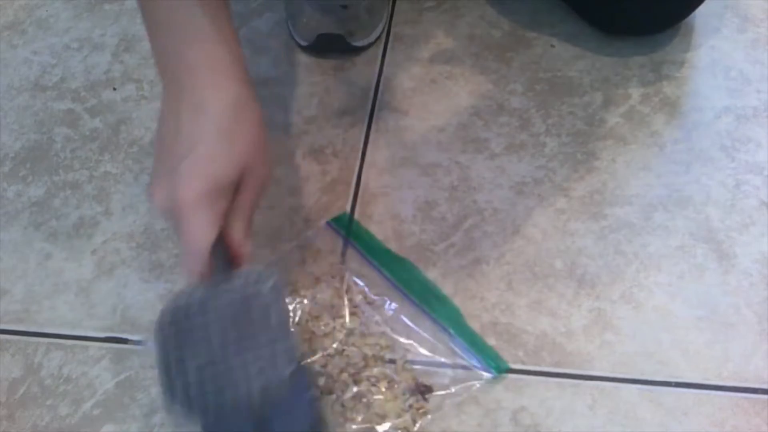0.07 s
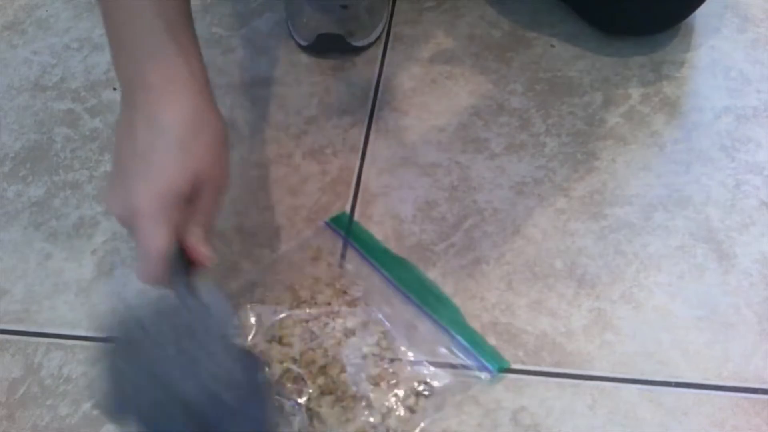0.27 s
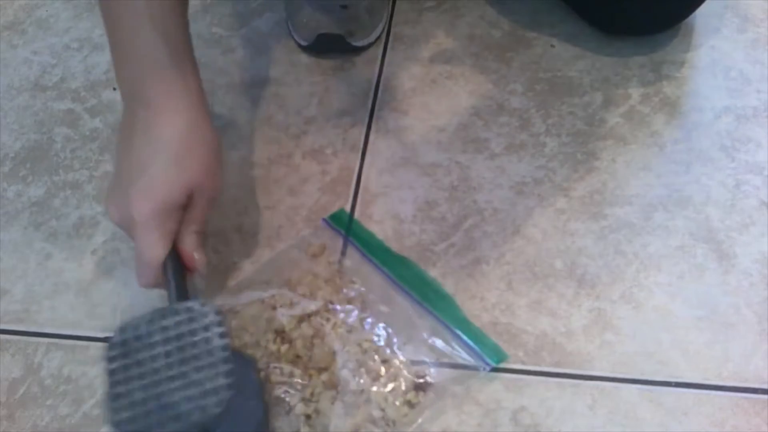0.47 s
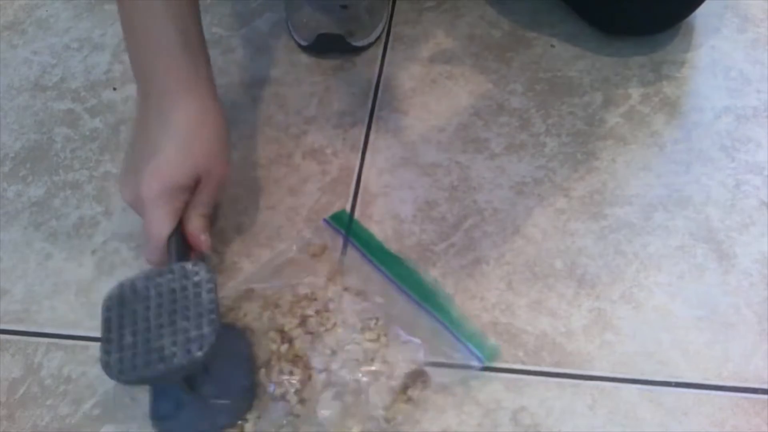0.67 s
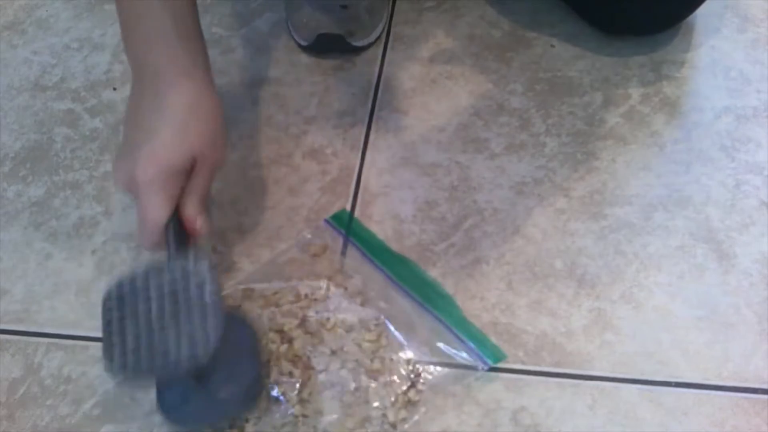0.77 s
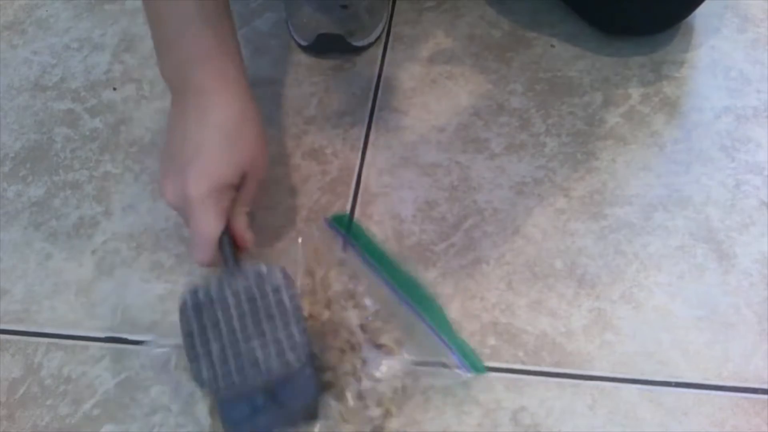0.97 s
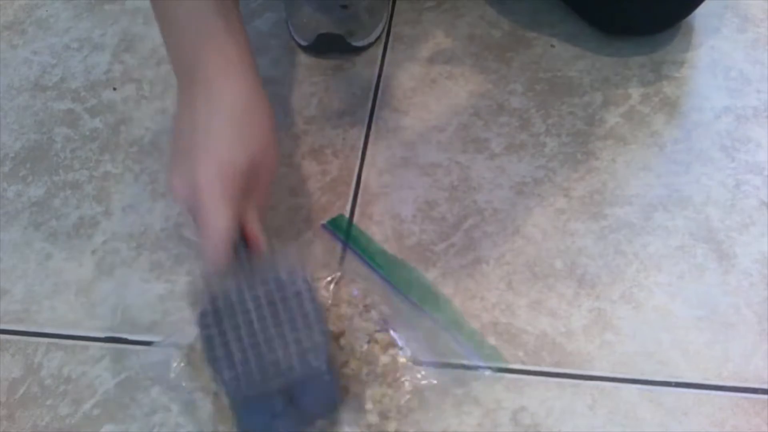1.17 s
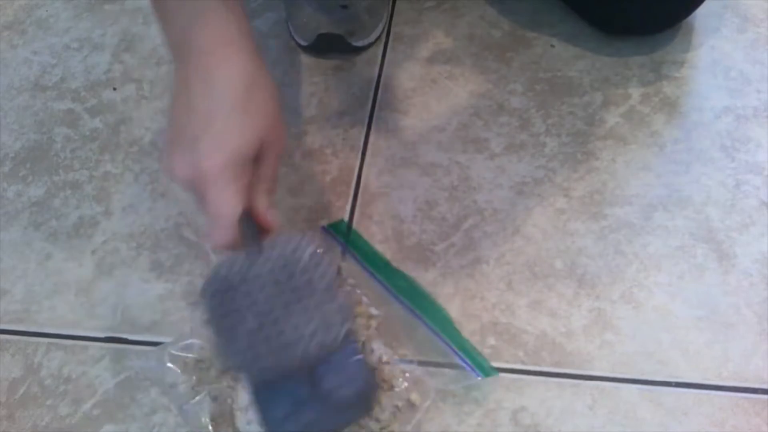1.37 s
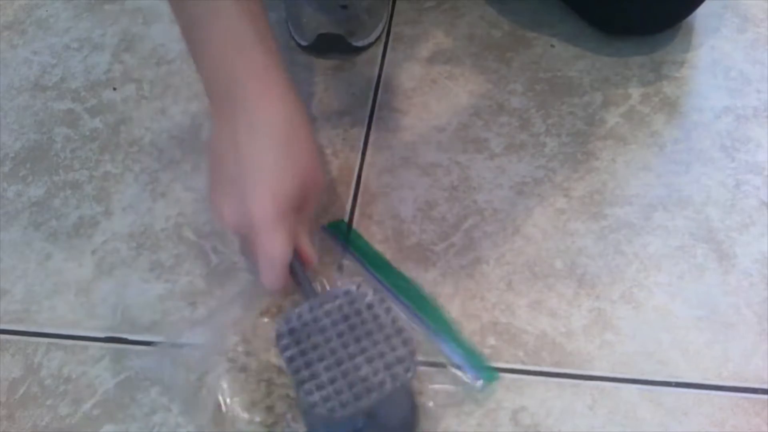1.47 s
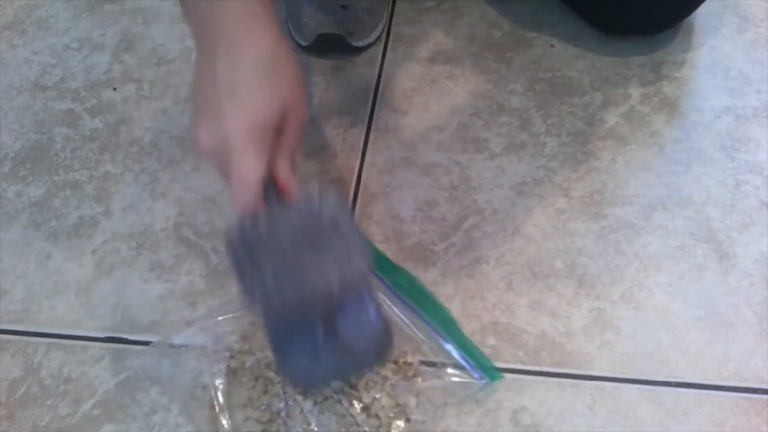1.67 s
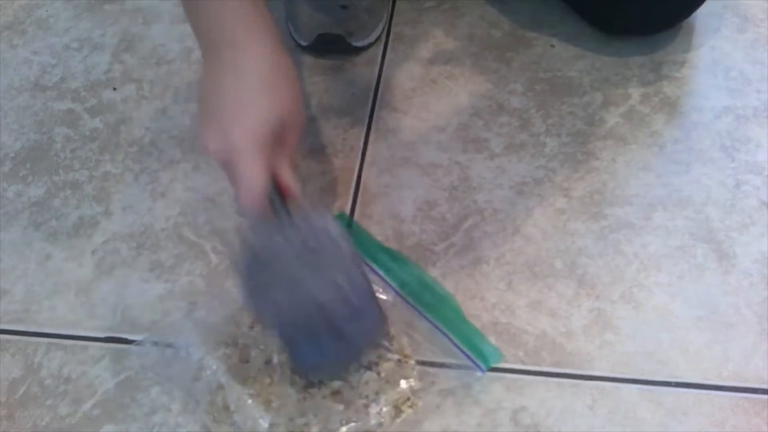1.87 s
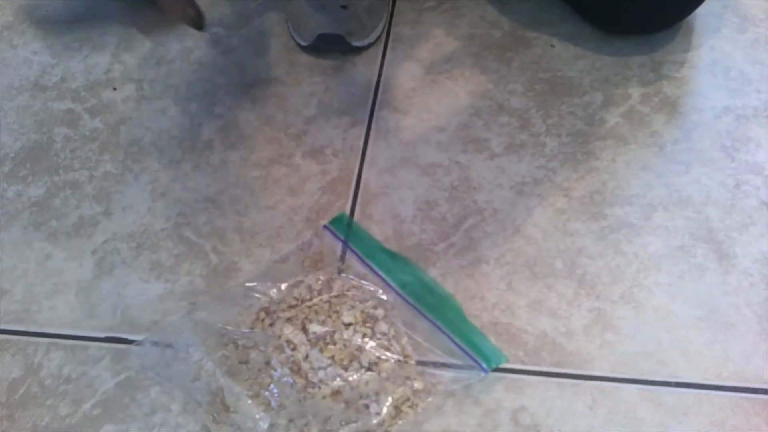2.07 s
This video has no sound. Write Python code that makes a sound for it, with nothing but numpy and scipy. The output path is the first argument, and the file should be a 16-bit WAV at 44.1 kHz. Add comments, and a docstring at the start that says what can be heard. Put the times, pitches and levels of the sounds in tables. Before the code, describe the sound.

A metal meat mallet pounds walnuts in a plastic bag on a hard tile floor

```python
"""First the last ringing and rustling of a blow just landed, then seven more blows about 0.3 s apart:
a metal meat mallet pounds walnuts in a plastic bag on a tiled kitchen floor, heard from close above.
Random clicks make the crunching nuts and rustling bag; damped sines make the thud, crack, tile and mallet.
Dying noise makes the room's answer, steady noise the room tone; the loudest landings overload the recorder."""
import sys
import numpy as np
from scipy import signal
from scipy.fft import rfft, irfft, next_fast_len
from scipy.io import wavfile

SR = 44100
rng = np.random.default_rng(int(sys.argv[2]) if len(sys.argv) > 2 else 0)


def digitize_waveform(pressure):
    """Quantize a signal to 16-bit integers and store it at the path in sys.argv[1].

    Rows of a 2-D input are taken as channels; values are limited to [-1, 1].
    """
    field = np.atleast_2d(pressure).T
    bounded = np.clip(field, -1, 1)
    quanta = np.round(bounded * 32767).astype(np.int16)
    wavfile.write(sys.argv[1], SR, quanta)


def how_loud(loudness_db):
    """Turn decibels into a plain amplitude multiplier (0 dB gives 1, 20 dB gives 10)."""
    steps = np.asarray(loudness_db, float) / 20
    return 10 ** steps


N = 93492

# steady room tone, its balance from low to high: pitch_hz, level_db
ROOM_TONE = [(15, -51), (25, -22), (175, 3.5), (786, -3), (1010, -10.5), (3120, -20), (4410, -29.5),
             (7040, -27.5), (9000, -11.5), (11700, -41), (19800, -120)]
# how the kitchen's echoes die at each pitch: pitch_hz, t60_s (time to fall by 60 dB), level_db
KITCHEN_ECHO = [(80, 0.1, -54.5), (195, 0.42, -10.5), (560, 0.42, -7.5), (1488, 0.48, -8),
                (3240, 0.24, -12.5), (6500, 0.22, -13)]
# tone of the rustling bag film: pitch_hz, level_db
FILM_TONE = [(300, -11), (1000, -11), (2200, -8), (3200, -12), (4600, -28), (7000, -23), (9000, -25.5)]
# short rustles as the film shifts: middle_s, level_db
FILM_SHIFTS = [(0.071, -47.5), (.317, -46), (0.371, -72.5), (.84, -55), (1.121, -42.5), (1.341, -62),
               (1.385, -75), (1.748, -60.5), (1.925, -54)]
# notes of the mallet head: pitch_hz, level_db, t60_s
# its lowest note, a beating pair, starts loud while the tile damps it, then rings on
HEAD_NOTES = [(2008, -23, .44), (2018, -28, .4), (2008, -2, .032), (2245, -24, .17), (2546, -22, .14),
              (2724, -26, .2), (2950, -25, .14), (3240, -24, .12), (3348, -23, .15), (3480, -25, .12),
              (6557, -36, .28)]
# bare metal meets tile: start_s, level_db
METAL_HITS = [(.4712, 0), (1.011, -26), (1.841, -28)]
# tone of cracking shells and kernels: pitch_hz, level_db
NUT_TONE = [(150, -60), (400, -7), (900, -4), (1900, 0), (3000, -5), (4500, -18.5), (7000, -17), (9000, -2)]
# blows, the first lands before the start: landing_s, crush_length_s, crunch_db, bag_settling_db, tile_ring_db
MALLET_BLOWS = [(-.09, 0.016, -41, -34, -16), (0.196, 0.024, -14.5, -41.5, -17),
                (0.4703, 0.0132, -7.5, -30.5, -15.5), (0.74, 0.016, -13.5, -42, -13.5),
                (1.011, 0.012, -6.5, -39, -5.5), (1.266, 0.013, -9.5, -38, 1.5),
                (1.5561, 0.022, -11, -38.5, -9.5), (1.844, 0.017, -6, -32.5, -20)]
# the landing on the tile, one per blow: start_s, push_db, push_pitch_hz, crack_db, crack_pitch_hz
TILE_LANDINGS = [(-.09, -3.5, 430, 1.5, 1720), (0.196, -34, 330, -13.5, 1800),
                 (0.4713, -6, 950, -15.5, 1416), (0.739, -14, 322, -17.5, 1520),
                 (1.0108, -3, 457, -3, 1846), (1.265, 7.5, 560, -4.5, 1620),
                 (1.5542, -4.5, 950, -1.5, 2320), (1.8414, 6, 513, 0.5, 1540)]
# notes of the floor tile: pitch_hz, level_db, t60_s
TILE_NOTES = [(133.7, -6.5, 0.24), (183.7, -25, 0.023), (237.5, -5.5, 0.15), (321, -5.5, 0.035),
              (385.5, 1, 0.053), (518, -19.5, .07), (580, -11, 0.24), (628, -13, 0.29), (770, 2.5, 0.04)]

LEAD = SR // 4   # samples made ahead of the start
M = N + LEAD   # samples made in all
T = (np.arange(M) - LEAD) / SR   # seconds from the start
AIR_DB = -51
FIRST_ECHO_S = .004
HEAD_ROOM_DB = -2.5   # how much of the ringing head reaches the room
RUSTLES_PER_S, SETTLE_T60_S, SHIFT_S = 2300, 0.49, 0.0035
# the crunch swells until landing, then dies
CRACKS_PER_S, CRUSH_RISE_DB, CRUSH_FALL_S = 6200, 23.5, 0.0025
CRUMBLE_DB, CRUMBLE_S = -16, 0.016   # broken pieces keep crumbling under the head
PUSH_T60_CYCLES = 4.9
CRACK_T60_S, CRACK_LEAD = .0045, 26   # the crack comes this many samples before the push
TILE_SPREAD_DB = 1.5   # each blow excites the tile's notes a little differently
# shards jump after a landing, louder when its push is louder
RUBBLE_DB, RUBBLE_S, RUBBLE_PER_S, RUBBLE_T60_S = -26.5, 0.036, 1500, 0.0033
RADIATES_HZ = 129.6   # deeper notes are hardly given off
MIC_LOW_HZ, MIC_STOP_HZ = 40, 8306 * 1.1   # at the upper one the sound is already 60 dB down
OVERLOAD, KNEE = .71, 10.0   # peak limit, and how sharply it sets in


def rms_one(x):
    """Scales to an average strength (rms) of 1."""
    return x / np.sqrt(np.mean(x ** 2) + 1e-20)


def at_hz(points, hz, column=1):
    """Reads a table between its rows, on a log-frequency axis."""
    p = np.array(points)
    return np.interp(np.log(np.maximum(hz, 1)), np.log(p[:, 0]), p[:, column])


def colour(x, spectrum):
    """Gives the sound a spectrum with a filter that never acts early (minimum phase)."""
    size = next_fast_len(M + 4096)
    hz = np.arange(size // 2 + 1) * SR / size
    cepstrum = irfft(np.log(how_loud(at_hz(spectrum, hz))), size)
    # folding the second half onto the first makes the filter causal
    cepstrum[1:size // 2] *= 2
    cepstrum[size // 2 + 1:] = 0
    return irfft(rfft(x, size) * np.exp(rfft(cepstrum)), size)[:M]


def clicks(s, db):
    """A train of single-sample clicks."""
    out = np.full(M, 1e-18)
    out[LEAD + (np.asarray(s) * SR).astype(int)] = how_loud(db)
    return out


def ring(x, hz, t60):
    """A resonance: a unit click sets a dying sine of starting height 1 ringing."""
    r = how_loud(-60 / (t60 * SR))
    w = 2 * np.pi * hz / SR
    return signal.lfilter([0, np.sin(w)], [1, -2 * r * np.cos(w), r * r], x)


def grains(per_s, size_db, spectrum):
    """Random clicks of uneven size, coloured, at rms 1."""
    sizes = how_loud(size_db * np.minimum(rng.exponential(1, M), 4)) * rng.choice([-1, 1], M)
    happens = rng.random(M) < per_s / SR
    return rms_one(colour(sizes * happens, spectrum))


def room_tone():
    """The quiet kitchen: steady coloured noise."""
    return how_loud(AIR_DB) * rms_one(colour(rng.standard_normal(M), ROOM_TONE))


def kitchen(x):
    """The room answers with many echoes: noise that dies at its own speed in each band."""
    t = np.arange(SR // 2) / SR
    edges = 60 * 2 ** np.arange(0, 7.6, .5)   # half-octave bands, in Hz
    white = rng.standard_normal((2, len(t)))   # neighbouring bands take turns
    tail = 0
    for k, (low, high) in enumerate(zip(edges, edges[1:])):
        hz = np.sqrt(low * high)
        t60 = at_hz(KITCHEN_ECHO, hz)
        band_filter = signal.butter(2, [low, high], "band", fs=SR, output="sos")
        band = signal.sosfilt(band_filter, white[k % 2])
        fading = how_loud(at_hz(KITCHEN_ECHO, hz, column=2) - 60 * t / t60)
        even_out = np.sqrt(2 * np.log(1000) / (t60 * SR))   # long tails get no extra energy
        tail = tail + band * fading * even_out
    return signal.fftconvolve(x, tail * np.clip(t / FIRST_ECHO_S - 1, 0, 1))[:M]


def bag():
    """Film and crumbs rustle on after each blow, and shift a few times later."""
    shape = 0
    for s, _, _, db, _ in MALLET_BLOWS:
        shape = shape + how_loud(db - 60 * np.maximum(T - s, 0) / SETTLE_T60_S) * (T > s)
    for s, db in FILM_SHIFTS:
        shape = shape + how_loud(db) * np.exp(-.5 * ((T - s) / SHIFT_S) ** 2)
    return shape * grains(RUSTLES_PER_S, size_db=4.0, spectrum=FILM_TONE)


def head():
    """Where bare metal meets tile, the mallet head rings at its own notes."""
    hits = clicks(*np.transpose(METAL_HITS))
    return sum(ring(hits * how_loud(db), hz, t60) for hz, db, t60 in HEAD_NOTES)


def nuts():
    """Shells and kernels crackle louder as the head presses down, then die away once it lands."""
    shape = 0
    for s, length, db, _, _ in MALLET_BLOWS:
        swell = how_loud(CRUSH_RISE_DB * np.clip((T - s) / length, -1, 0))
        fade_in = np.clip((T - s + length) / 0.0044, 0, 1)
        after = np.maximum(T - s, 0)
        fall = np.exp(-after / CRUSH_FALL_S) + how_loud(CRUMBLE_DB) * np.exp(-after / CRUMBLE_S)
        shape = shape + how_loud(db) * swell * fade_in * fall
    return shape * grains(CRACKS_PER_S, size_db=2.0, spectrum=NUT_TONE)


def landing():
    """A damped low push that also rings the tile, a short crack, and jumping shards."""
    out = np.zeros(M)
    spread = rng.normal(0, TILE_SPREAD_DB, (len(MALLET_BLOWS), len(TILE_NOTES)))
    for (s, push_db, push_hz, crack_db, crack_hz), blow, odd_db in zip(TILE_LANDINGS, MALLET_BLOWS, spread):
        at = LEAD + int(s * SR)
        span = slice(at - 100, at + SR // 2)
        hit = clicks([s], [0])[span]
        push = ring(hit, push_hz, PUSH_T60_CYCLES / push_hz)
        drive = push * push_hz / SR   # what the push gives to the tile
        tile = sum(ring(drive, hz, t60) * how_loud(db + odd) for (hz, db, t60), odd in zip(TILE_NOTES, odd_db))
        crack = ring(np.roll(hit, -CRACK_LEAD), crack_hz, CRACK_T60_S)
        jumps = rng.standard_normal(len(hit)) * (rng.random(len(hit)) < RUBBLE_PER_S / SR)
        dying = signal.lfilter([1], [1, -np.exp(-1 / (RUBBLE_S * SR))], hit)
        rubble = rms_one(ring(jumps, crack_hz, RUBBLE_T60_S)) * dying
        out[span] += how_loud(push_db) * (push + how_loud(RUBBLE_DB) * rubble)
        out[span] += how_loud(blow[4]) * tile + how_loud(crack_db) * crack
    return signal.sosfilt(signal.butter(5, RADIATES_HZ, "high", fs=SR, output="sos"), out)


def scene():
    """Blows, their room, and the room tone."""
    near = nuts() + bag() + landing()
    metal = head()
    echoes = kitchen(near + how_loud(HEAD_ROOM_DB) * metal)
    return (near + metal + echoes + room_tone())[None, LEAD:]


def band_limit(x):
    """A steep low-pass at the top of the band."""
    return signal.sosfilt(signal.butter(12, 15920, fs=SR, output="sos"), x)


def record(dry):
    """The microphone path loses deep bass and all above its top, then loud peaks are flattened."""
    x = signal.sosfilt(signal.butter(2, MIC_LOW_HZ, "high", fs=SR, output="sos"), dry)
    x = signal.sosfilt(signal.cheby2(10, 60, MIC_STOP_HZ, fs=SR, output="sos"), x)
    mix = x / (1 + np.abs(x / OVERLOAD) ** KNEE) ** (1 / KNEE)
    return band_limit(mix)


dry = scene()
out = record(dry)
digitize_waveform(out)
```